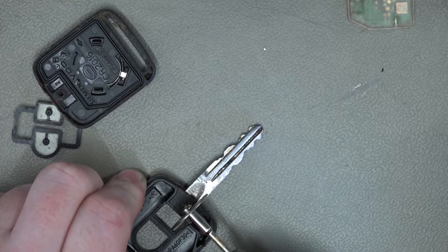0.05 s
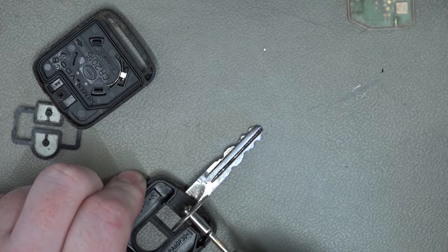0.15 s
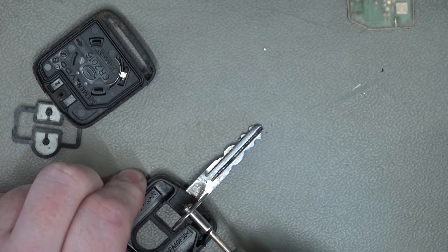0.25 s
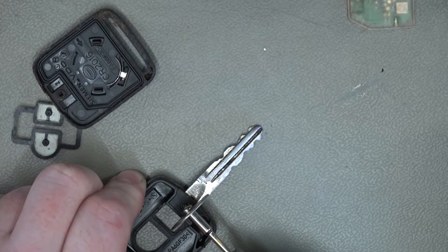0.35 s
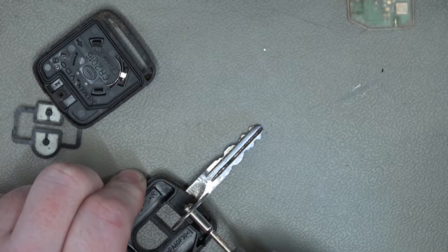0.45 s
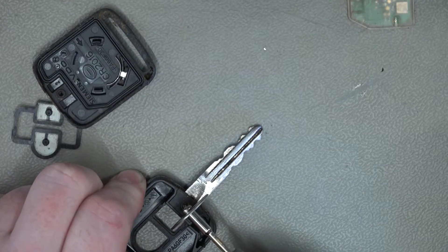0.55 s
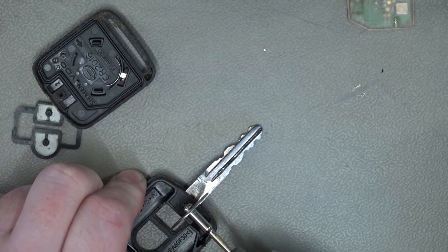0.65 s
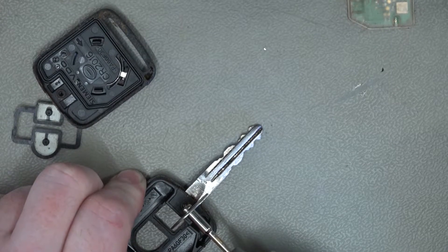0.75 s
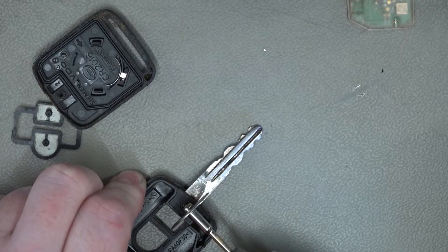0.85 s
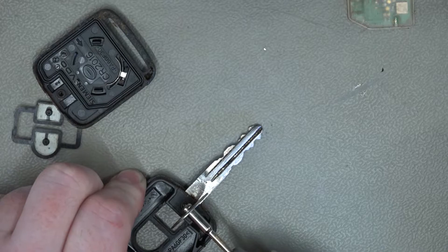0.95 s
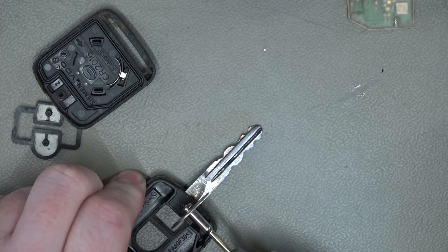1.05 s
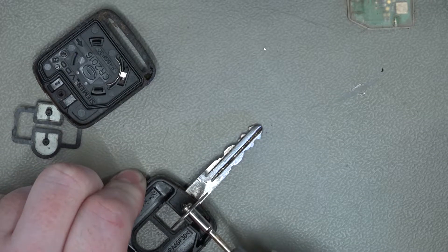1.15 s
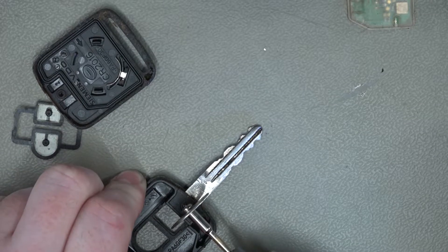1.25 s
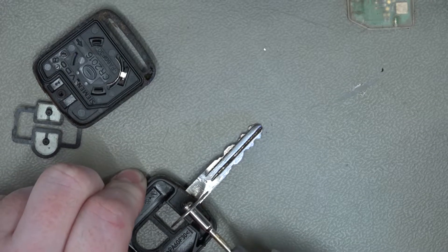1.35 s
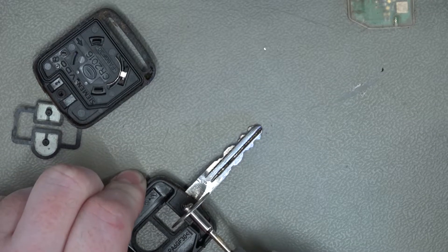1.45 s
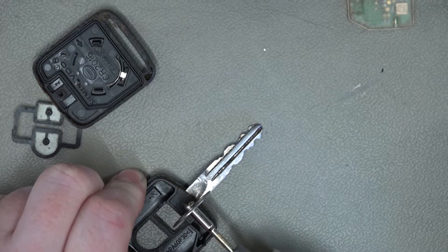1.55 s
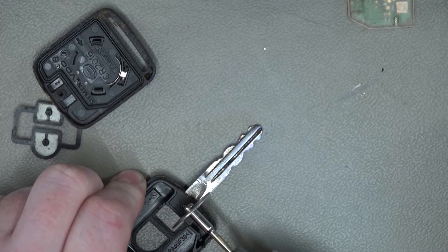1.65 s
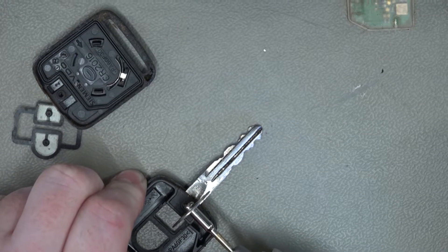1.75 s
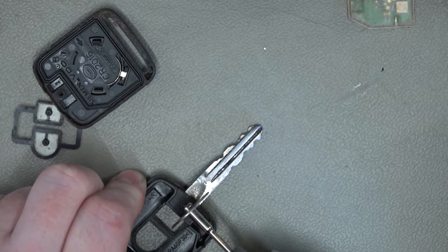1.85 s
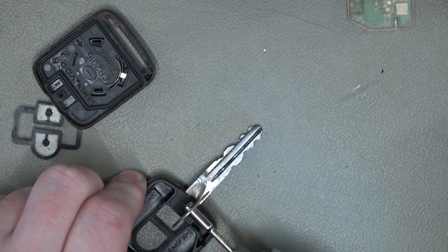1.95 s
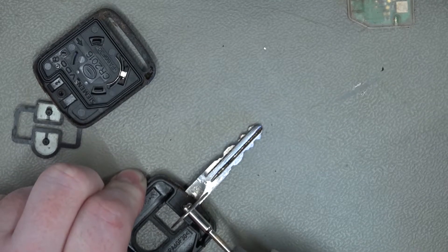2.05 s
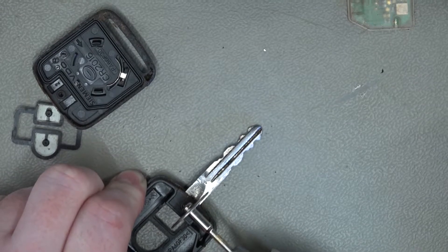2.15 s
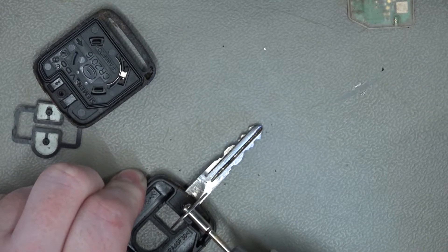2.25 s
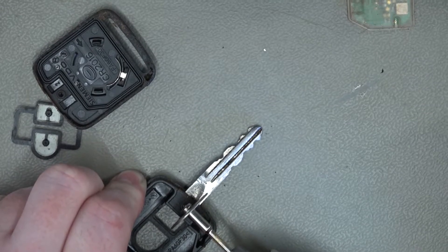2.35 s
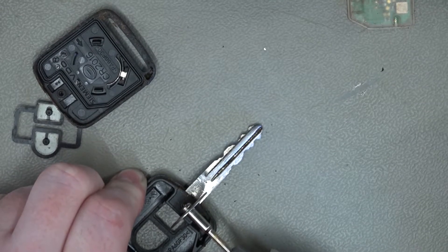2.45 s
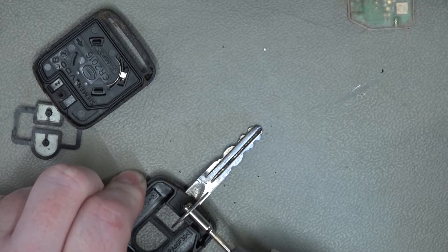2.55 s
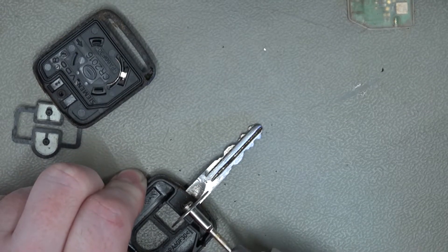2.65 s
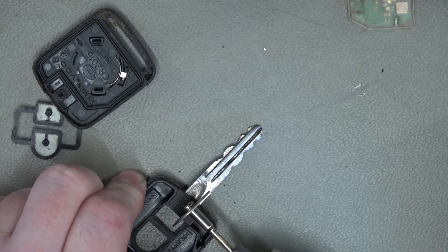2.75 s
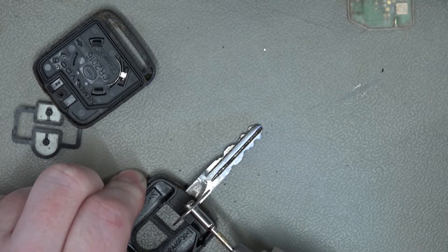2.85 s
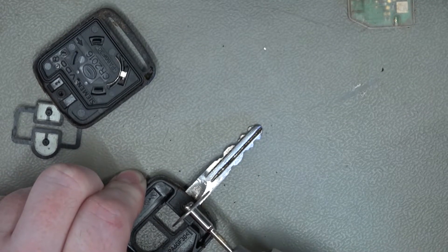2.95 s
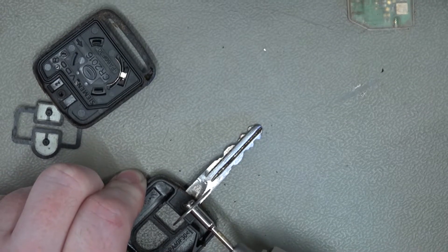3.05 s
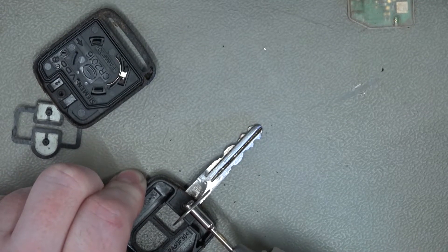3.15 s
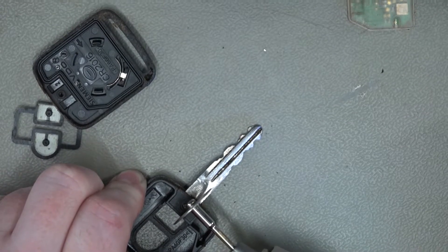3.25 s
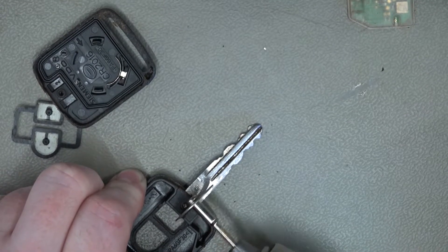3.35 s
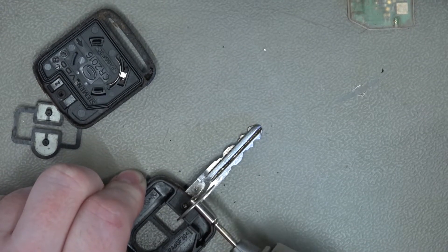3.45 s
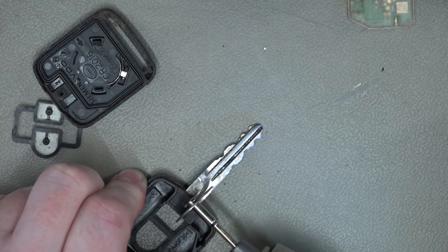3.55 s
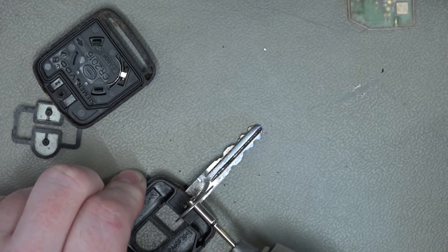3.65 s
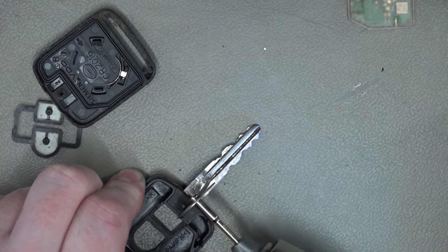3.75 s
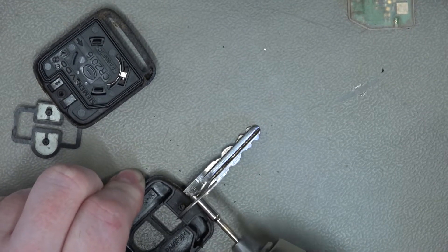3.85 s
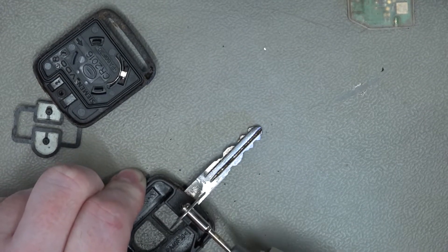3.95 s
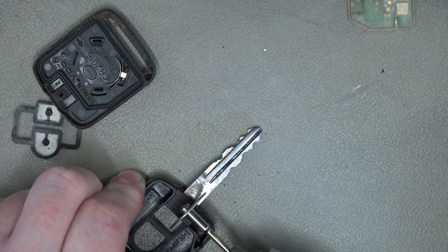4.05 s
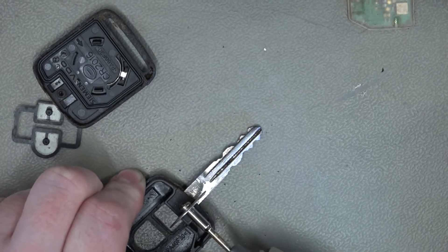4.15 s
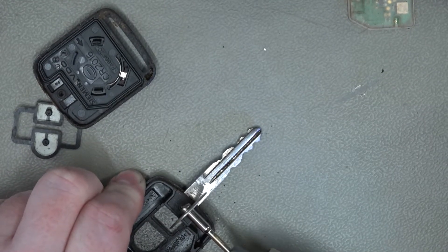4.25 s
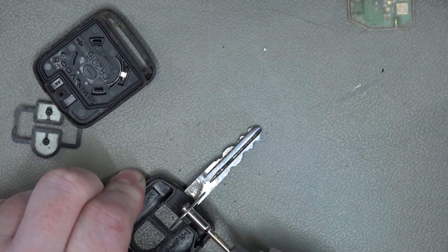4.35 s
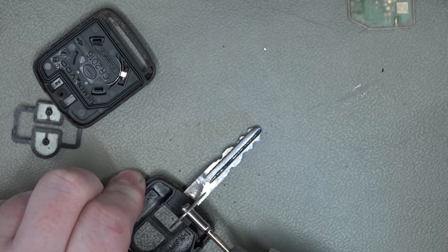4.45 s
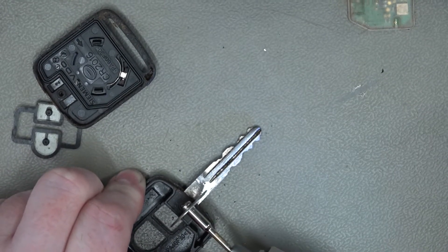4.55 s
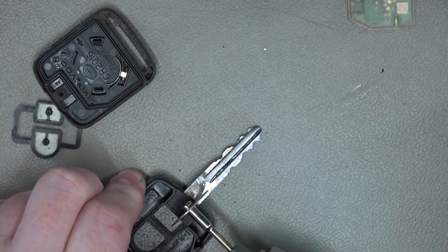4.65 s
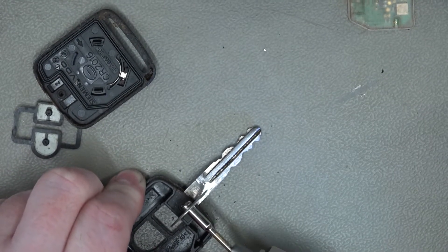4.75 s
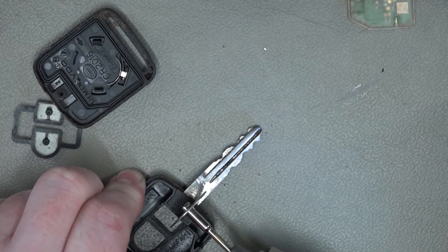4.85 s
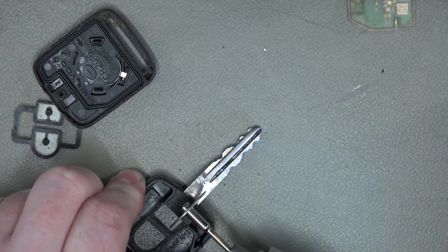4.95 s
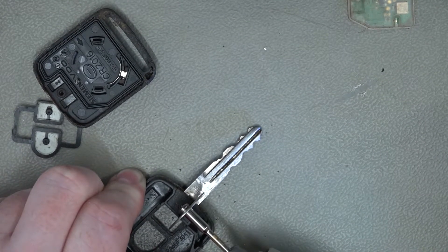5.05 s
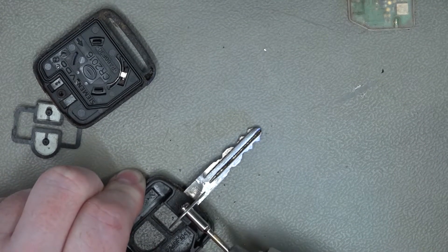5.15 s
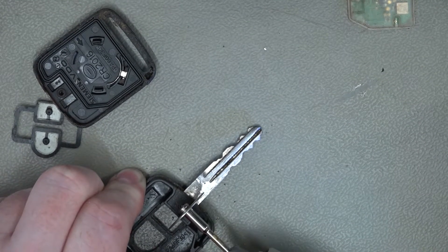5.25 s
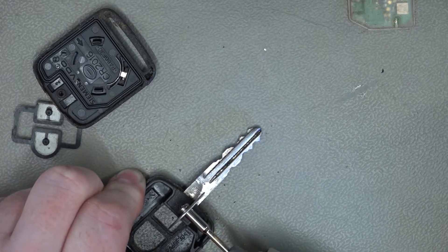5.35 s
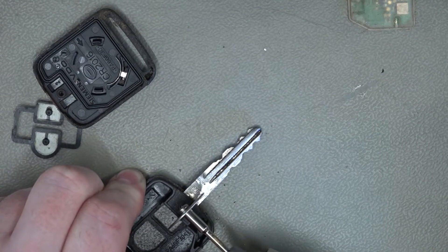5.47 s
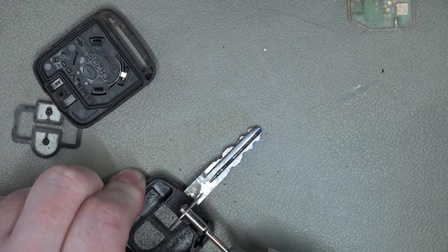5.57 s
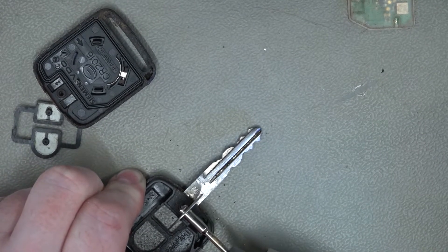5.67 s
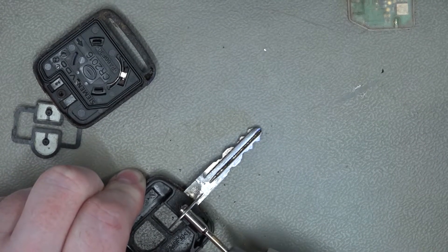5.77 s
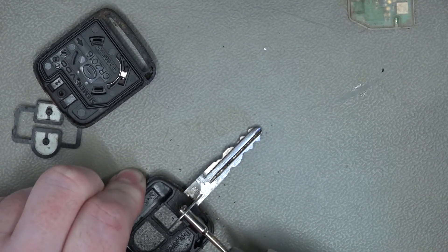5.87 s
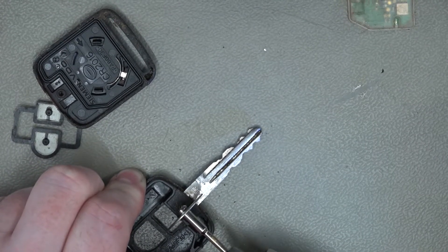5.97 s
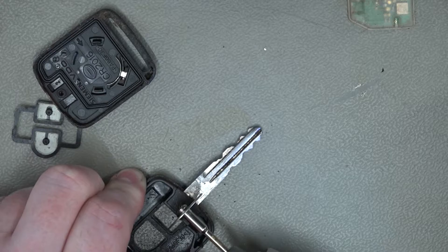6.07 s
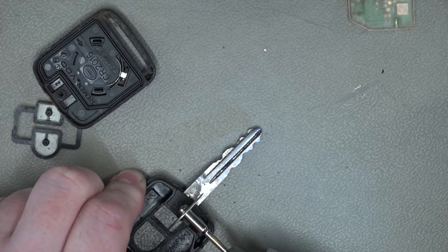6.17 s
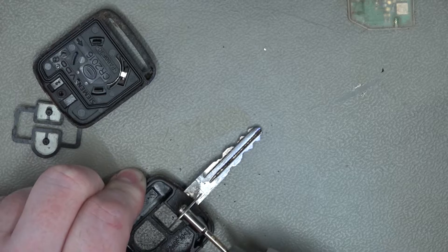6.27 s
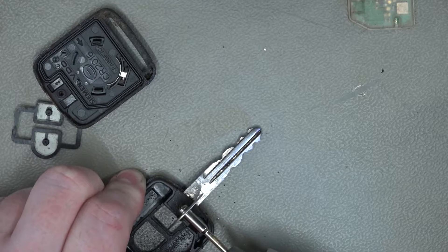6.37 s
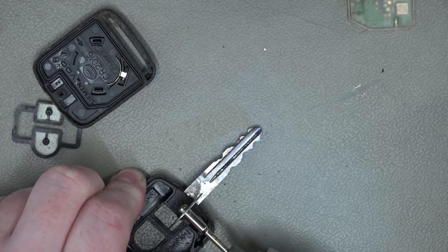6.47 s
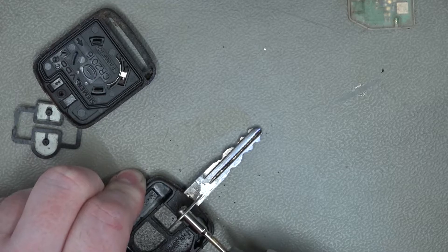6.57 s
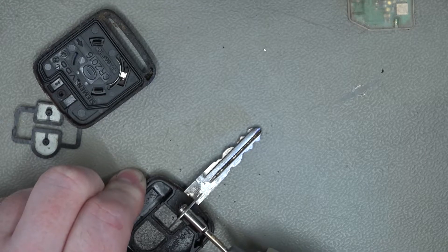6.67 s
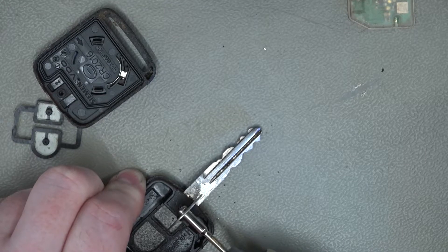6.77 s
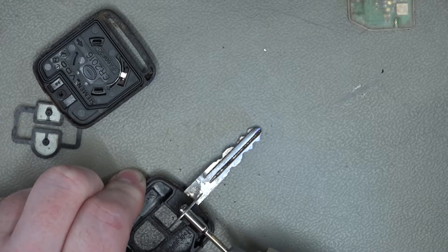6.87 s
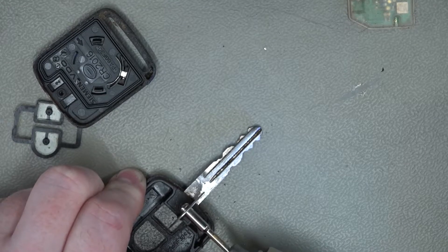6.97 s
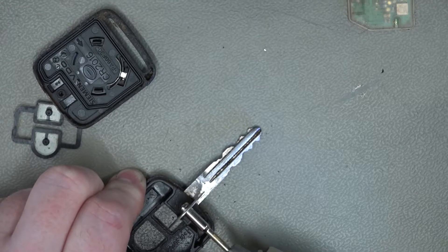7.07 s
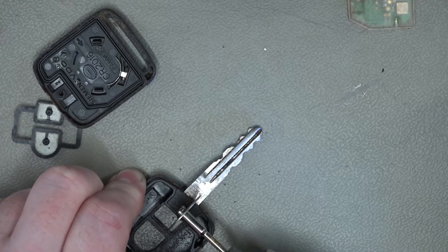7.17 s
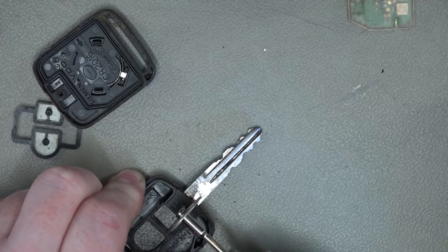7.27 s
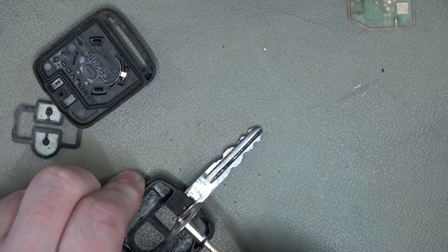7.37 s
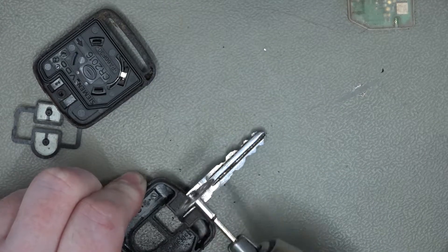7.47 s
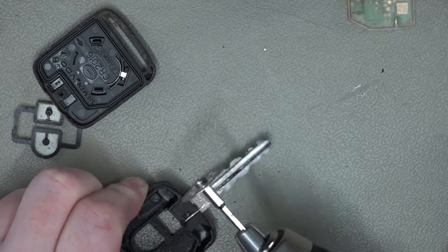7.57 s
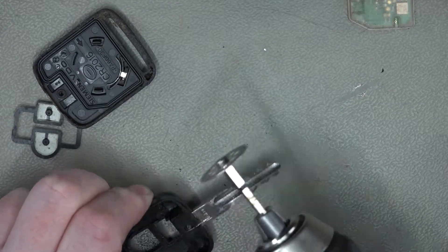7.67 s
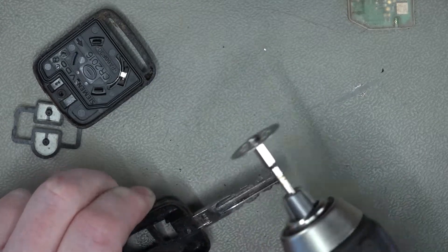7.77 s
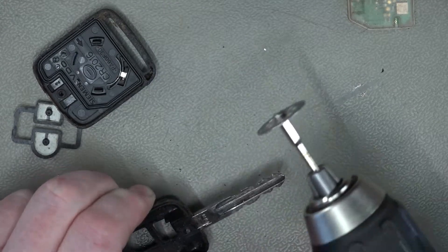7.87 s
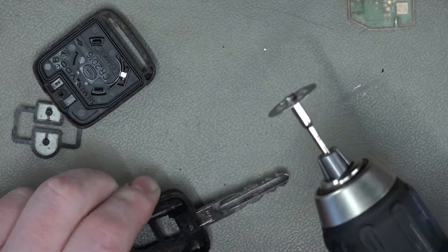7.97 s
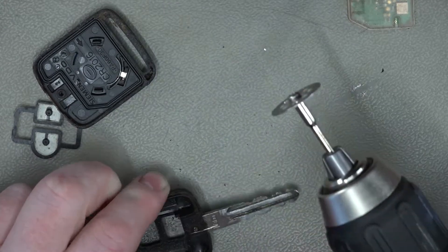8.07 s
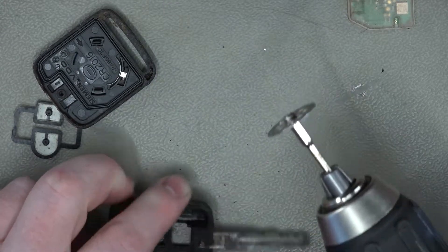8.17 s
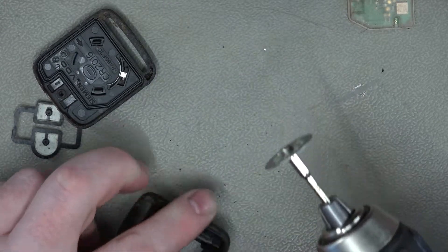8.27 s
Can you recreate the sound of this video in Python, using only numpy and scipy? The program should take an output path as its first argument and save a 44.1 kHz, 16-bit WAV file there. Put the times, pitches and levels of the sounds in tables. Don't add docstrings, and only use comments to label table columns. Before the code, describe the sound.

Steady gritty drill motor whine with a throbbing low shake and thin metallic squeal from cutting plastic, stopping suddenly before light knocks and scuffs.

```python
import sys
import numpy as np
from scipy import signal
from scipy.fft import rfft, irfft
from scipy.io import wavfile
from scipy.ndimage import uniform_filter1d

SR = 44100
rng = np.random.default_rng(int(sys.argv[2]) if len(sys.argv) > 2 else 0)


def elevation(decibels):
    levels = np.asarray(decibels, float)
    return 10 ** (levels / 20)


def inscribe(sig):
    pcm = np.round(np.clip(np.atleast_2d(sig).T, -1, 1) * 32767)
    wavfile.write(sys.argv[1], SR, pcm.astype(np.int16))


N = 366912
T = np.arange(N) / SR
FIRST_STAGE = 3.671
OUT_S, DYING_S = 7.23, 7.485


def evened(x):
    return x / np.sqrt(np.mean(x ** 2) + 1e-20)


def curves(rows):
    t_s, *columns = np.transpose(rows)
    gate = uniform_filter1d(1. * (T <= t_s[-1]) * (T >= t_s[0]), size=600)
    return [np.interp(T, t_s, column) for column in columns] + [gate]


def coloured(points, lo_hz, hi_hz):
    hz = np.fft.rfftfreq(N, 1 / SR)
    point_hz, point_db = np.transpose(points)
    shape_db = np.interp(np.log(hz + 1), np.log(point_hz), point_db)
    z = rfft(rng.standard_normal(N)) * elevation(shape_db)
    inside = (hz > lo_hz) & (hz < hi_hz)
    return irfft(z, N) * N / np.sqrt(2 * np.sum(abs(z[inside]) ** 2))


def modes(x, table):
    out = np.zeros(N)
    for hz, width_hz, db in table:
        b, a = signal.iirpeak(hz, hz / width_hz, SR)
        out += elevation(db) * signal.lfilter(b, a, x) * np.sqrt(SR / np.pi / width_hz)
    return out


def slow(hz):
    knots_s = np.arange(0, N / SR + 1, .5 / hz)
    return evened(np.interp(T, knots_s, rng.standard_normal(len(knots_s))))


def grit(spread_db):
    size = uniform_filter1d(rng.exponential(1, N), size=8)
    return evened(rng.standard_normal(N) * elevation(spread_db * size))


def lobe(turns, at, sharp):
    return np.exp(sharp * (np.cos(2 * np.pi * (turns - at)) - 1))


def tone(turns):
    return np.sqrt(2) * np.cos(2 * np.pi * (turns + rng.random()))


def band(x, hz, kind):
    return signal.sosfiltfilt(signal.butter(4, hz, kind, fs=SR, output="sos"), x)


def bump(at_s, length_s):
    return np.exp(-(2 * (T - at_s) / length_s) ** 4)


def step(at_s, length_s):
    return .5 + .5 * np.tanh(2 * (T - at_s) / length_s)


def law(load, depth, base_db, per_load_db, full_depth_db):
    return base_db + per_load_db * load + full_depth_db * depth


def gears(motor, chuck, load, depth):
    # t/s, level/dB
    near = [(0.0, -35), (0.8, -38.5), (1.3, -38), (2.0, -40.5), (2.8, -39), (3.6, -39), (4.4, -39.5),
            (5.6, -41), (6.0, -39), (7.26, -40.5)]
    # f/Hz, density/dB
    gear_colour = [(35, -37.5), (60, -28), (107, -7.5), (231, -9.5), (351, -10.5), (385, -8), (443, -16),
                   (613, -39), (931, -1.5), (2300, -3.5), (3190, -0.5), (4220, -5.5), (5700, 0.5),
                   (6560, -12), (15500, -23)]
    # f/Hz, width/Hz, level/dB
    shell = [(906, 74, -6.5), (1800, 54, -6.5), (3950, 180, -20), (5100, 600, -18), (5455, 38, -7),
             (5510, 80, -21), (14600, 1100, -13)]
    # f/Hz, width/Hz, level/dB
    facing = [(3410, 130, -12), (3477, 37, -4.5), (3665, 180, -3.5), (4930, 960, -2)]
    brake_s, turned_s = 7.3, 7.36
    dying_for_s = np.maximum(T - DYING_S, 0)
    level_db = curves(near)[0] - 4.5 * step(brake_s, .05) - 351 * dying_for_s
    level_db -= 2.5 * bump(4.03, .17)
    facing_db = law(load, depth, -0.12, 0, -2.1) + 6.3 * step(turned_s, .04)
    low_db = law(load, depth, -2.74, -0.17, .2) + 6 * step(brake_s, .05) + 60 * dying_for_s

    stage = 2 * np.pi * motor / FIRST_STAGE
    throb = 1 + 0.14 * np.cos(stage) + 0.02 * np.cos(2 * stage) + 0.081 * np.cos(3 * stage)
    throb += 0.14 * np.cos(2 * np.pi * motor)
    throb += 0.03 * np.cos(2 * np.pi * (chuck + 0.03))

    body = elevation(-2.0) * coloured(gear_colour, 5283, 6160) + modes(grit(1.3), shell)
    low = band(body, 4300, "low")
    top = band(body, 6100, "high")
    speed = np.gradient(motor) * SR / 387
    body += low * (elevation(0.21 * (low_db + 2.5)) - 1)
    body += top * (speed ** 0.5 - 1)
    body += elevation(1.9 * facing_db) * speed ** 2 * modes(grit(2.5), facing)
    return elevation(level_db + 0.44 * slow(9)) * throb * body


def whine(motor, chuck, load, depth):
    # motor order, level/dB
    faint = [(4, -56), (9, -52), (15, -57), (9 / FIRST_STAGE, -52), (4.72, -57), (14.6, -57), (21, -66),
             (32, -73)]
    # first-stage order, level/dB
    teeth = [(46, -2), (47, -5), (48, -2), (49, -4)]
    # motor order, t/s, length/s, level/dB
    flare_rows = [
        (10, 7.29, .18, -43),
        (10, 7.345, .06, -44),
        (1, 7.37, .09, -55),
        (4, 7.37, .11, -48),
        (14.6, 7.418, .017, -33),
    ]
    tenth_db = law(load, depth, -43, 2.8, -2.4)
    eighth_db = law(load, depth, -42, -.5, -4)
    shaft_db = law(load, depth, -49, -2.4, -5)
    teeth_db = law(load, depth, -43, 0.73, -7.5)
    last_db = law(load, depth, -45, -2, 10.3)
    shaft_db += 2.8 * bump(5.65, .7)

    wobble = motor + 0.007 * slow(40)
    out = elevation(tenth_db + 1.3 * slow(5)) * tone(10 * wobble)
    out += elevation(eighth_db + 1.4 * slow(8)) * tone(8 * wobble)
    swell = 1 + 0.4 * np.cos(2 * np.pi * (chuck + 0.11))
    out += elevation(shaft_db + 0.87 * slow(7)) * swell * tone(motor)
    for order, db in faint:
        out += elevation(db + 4.1 * slow(13)) * tone(order * wobble)
    for order, db in teeth:
        out += elevation(teeth_db + db + 2.3 * slow(14)) * tone(order / FIRST_STAGE * wobble)
    out += elevation(last_db - 10 + 2.7 * slow(17)) * tone(50 / FIRST_STAGE * wobble)

    flares = sum(elevation(db) * bump(t_s, length_s) * tone(order * wobble) for order, t_s, length_s, db in flare_rows)
    return (1 - step(OUT_S, .03)) * out + flares * elevation(1.7 * slow(90))


def shake(motor, chuck, load, depth):
    # t/s, level/dB
    grip = [(0.0, -21), (0.5, -21), (1.0, -27), (1.25, -26), (1.5, -23), (2.5, -23.5), (2.75, -24.5),
            (3.0, -23), (3.5, -24.5), (4.0, -28), (4.4, -26), (5.25, -29), (5.75, -29), (6.25, -27.5),
            (6.6, -27), (7.2, -28)]
    # chuck order, level/dB
    low_orders = [(2, -7.5), (3, -13), (4, -7), (5, -10)]
    # chuck order, level/dB
    high_orders = [(6, -9.5), (7, -5.5), (8, -10), (9, -5.5), (10, -16), (11, -16), (12, -14), (13, -19),
                   (14, -13.5), (16, -7.5), (18, -18), (19, -20), (23, -17)]
    grip_db = curves(grip)[0]
    fade_db = -72 * np.maximum(T - OUT_S, 0)
    low_db = law(load, depth, -50, 1, 0) + 1.5 * (grip_db + 25)
    over_db = law(load, depth, -55.5, 2.2, 6.8) + 1.1 * (grip_db + 25.5)

    low = sum(elevation(db + 2.5 * slow(2.8)) * tone(order * chuck) for order, db in low_orders)
    low += elevation(-9) * tone(motor / FIRST_STAGE)
    low += elevation(-4.5) * coloured([(25, -7), (45, 1.5), (120, 3), (200, -32.5)], 45, 150)
    low *= 1 - step(DYING_S, .06)

    over = elevation(-12) * coloured([(90, -27.5), (140, 21.5), (300, 0.5), (600, 2.5)], 134.6, 340)
    for order, db in high_orders:
        tilt_db = 1.35 * (depth - 0.52) * min(order - 9, 3)
        over += elevation(db + tilt_db + 2.1 * slow(1.21)) * tone(order * chuck)

    unbalance = elevation(grip_db + fade_db) * np.sqrt(2) * np.cos(2 * np.pi * chuck)
    return unbalance + elevation(low_db) * low + elevation(over_db + 3.9 * fade_db) * over


def room():
    # f/Hz, density/dB
    air = [(20, 0), (60, -5), (130, -20), (300, -27), (750, -26), (1600, -36), (3500, -46), (8000, -62),
           (15500, -82)]
    # f/Hz, level/dB
    hum_lines = [(49.5, -60), (100, -74.5), (143, -80), (500, -85), (700, -87.5), (750, -82.5)]
    sway = coloured([(3, -11), (8, 20), (13, 10), (19, 21), (30, 14), (60, -55)], 5.5, 19)
    sway /= np.sqrt(uniform_filter1d(sway ** 2, size=5000) + .1)
    sway_db = -40.5 + 2 * slow(1.5) - 16 * step(7.6, .1)
    hum = sum(elevation(db) * tone(hz * T) for hz, db in hum_lines)
    return elevation(-78) * coloured(air, 150, 15000) + hum + elevation(sway_db) * sway


def cut(chuck, load, depth):
    # f/Hz, width/Hz, level/dB
    disc = [(2713, 77, 3), (2764, 23, 5.5), (2880, 49, 3.5)]
    # f/Hz, width/Hz, level/dB
    housing = [(997, 113, 0.5), (1035, 50, -0.5)]
    # f/Hz, width/Hz, level/dB
    slot_edge = [(1130, 90, 3), (1324, 84, -2), (1456, 80, -10)]
    # t/s, length/s, level/dB
    catches = [
        (0.895, 0.17, -56),
        (1.523, 0.45, -47),
        (2.695, .35, -47),
        (3.417, 0.19, -39.5),
        (3.52, 0.054, -42),
        (3.785, .09, -32.5),
        (3.886, 0.11, -38),
        (4.22, 0.093, -47),
        (6.2, 0.23, -46.5),
        (7.08, 0.15, -47.5),
    ]
    # t/s, length/s, level/dB
    leans = [
        (2.95, 0.96, -49),
        (3.498, 0.066, -44),
        (3.64, .1, -45),
        (4.241, .14, -42.5),
        (4.45, .3, -46.5),
        (4.663, 0.09, -47),
        (5.28, 0.23, -46.5),
        (5.616, 0.17, -51),
    ]
    ring = elevation(law(load, depth, -56, 0, 23.25))
    thrum = elevation(law(load, depth, -51.5, .5, 4.5))
    scrape = elevation(law(load, depth, -50, 0.89, -2))
    hiss_db = law(load, depth, -57, 0.34, 6.9)
    hiss_db += 2.7 * bump(4.35, 1.6)
    scrape += sum(elevation(db) * bump(t_s, length_s) for t_s, length_s, db in catches)
    thrum += sum(elevation(db) * bump(t_s, length_s) for t_s, length_s, db in leans)

    bite = elevation(slow(20))
    touch = bite * (lobe(chuck, .07, 2.6) + .5 * lobe(chuck, .5, 4) + .1)
    squeal_hz = 2790 + 60 * slow(90) + 40 * np.cos(2 * np.pi * (2 * chuck + 0.31))
    squeal = evened(touch * elevation(0.92 * slow(110)) * tone(np.cumsum(squeal_hz) / SR))
    out = ring * (.8 * squeal + 0.5 * evened(modes(grit(3.5) * touch, disc)))

    knead = bite * (lobe(chuck, 0.0064, 0.58) + 1.75 * lobe(chuck, -0.3, 19))
    out += thrum * evened(modes(grit(4.1) * knead, housing))
    out += scrape * evened(modes(grit(6.7) * (knead + 0.5), slot_edge))

    dust = coloured([(1000, 0), (6000, -5.5), (9300, 8.5), (10300, -10), (16000, -16)], 7000, 10000)
    spray = evened(lobe(chuck, -.079, 1.1) + .3)
    out += elevation(hiss_db + 1.3 * slow(30)) * dust * bite * spray
    return (1 - step(OUT_S + .025, .03)) * out


def handling():
    # f/Hz, width/Hz, level/dB
    part = [(325, 29, -2), (700, 39, -4.5), (940, 26, -5.5), (1600, 110, -7), (2070, 77, -29),
            (2530, 77, -9), (3320, 140, -7.5)]
    # start/s, length/s, level/dB, brightness/dB, sag/(dB/s)
    strokes = [
        (7.56, .13, -70.5, -14, 20),
        (7.693, 0.04, -46, -25.5, 60),
        (7.736, 0.074, -44.5, -19.5, 160),
        (7.809, 0.082, -58.5, -13.5, -80),
        (7.893, 0.332, -69, -12, 25),
        (8.196, 0.12, -85, -2, -150),
    ]
    # t/s, peak/dB, f/Hz, width/Hz, t60/s
    clicks = [(7.445, -30, 3950, 400, .3), (7.465, -34, 765, 700, .04), (7.514, -33.5, 3020, 1800, .03),
              (7.539, -42, 1500, 2000, .03), (7.697, -44, 2600, 1500, .015), (7.7, -40, 700, 201, 0.038),
              (7.737, -46, 1500, 1200, .03), (7.872, -41.5, 2190, 1800, .008),
              (7.96, -67, 3500, 700, 0.033), (8.016, -53, 4850, 4000, 0.0072),
              (8.017, -56, 1100, 600, 0.033)]
    # t/s, peak/dB, f/Hz, t60/s
    thumps = [
        (7.448, -22, 21, 0.34),
        (7.525, -31, 13.4, 0.23),
        (7.688, -30, 23, 0.36),
        (7.741, -33, 13.2, 4.6),
    ]
    drag = elevation(-2.5) * evened(band(modes(grit(5), part), 4100, "low"))
    drag += elevation(-2) * coloured([(100, -9), (250, -0.5), (1000, 2), (3700, -12), (4500, -40), (9000, -70)], 400, 4000)
    fizz = coloured([(3000, -28), (4200, -2.5), (6000, -6.5), (7200, -10), (15000, -27)], 4000, 9000)
    out = np.zeros(N)
    for start_s, length_s, db, bright_db, sag_db_per_s in strokes:
        envelope = step(start_s, .0054) * (1 - step(start_s + length_s, .021))
        envelope *= elevation(db - sag_db_per_s * (T - start_s))
        out += envelope * elevation(-2.5) * (drag + elevation(bright_db) * fizz)

    click_t = T[:3000]
    for t_s, db, hz, width_hz, t60_s in clicks:
        b, a = signal.iirpeak(hz, hz / width_hz, SR)
        burst = rng.standard_normal(len(click_t)) * elevation(-60 * click_t / max(t60_s, .003))
        knock = signal.lfilter(b, a, signal.lfilter(b, a, burst))
        out[round(t_s * SR):][:len(click_t)] += elevation(db) * knock / abs(knock).max()

    settle = 1 - step(8.28, .04)
    for t_s, db, hz, t60_s in thumps:
        after_s = np.maximum(T - t_s, 0)
        out -= elevation(db - 60 * after_s / t60_s) * np.sin(2 * np.pi * hz * after_s) * settle
    return out


def scene():
    # t/s, motor speed/(turns/s)
    running = [(0.0, 388.2), (0.24, 385.8), (0.85, 389.3), (1.33, 389.1), (1.4, 386.4), (2.27, 385.9),
               (3.24, 388.7), (3.54, 383.9), (3.6, 386.9), (3.91, 382.1), (4.01, 390.4), (4.82, 384.4),
               (5.06, 390.3), (5.79, 389.7), (6.74, 385.8), (6.94, 388.4), (7.03, 383.6), (7.27, 390.9)]
    # t/s, motor speed/(turns/s)
    braking = [(7.317, 396), (7.369, 347.5), (7.41, 277.5), (7.451, 228), (7.501, 94), (7.54, 4.3)]
    # t/s, depth/(0-1)
    depth_rows = [(0.0, 0), (1.0, 0), (2.4, 0.53), (2.65, 0.3), (3.2, 0.68), (3.85, 0.87), (4.1, 0.76),
                  (4.5, 0.89), (4.92, 1.), (5.1, 0.77), (5.5, 0.85), (6.0, 0.98), (7.15, 0.96), (7.3, 0.66)]
    turns_per_s = curves(running + braking)[0]
    motor = np.cumsum(turns_per_s) / SR
    chuck = motor / 15.256 + .124
    load = uniform_filter1d(np.clip((387.5 - turns_per_s) / 3, -1.5, 1.5), size=6000)
    depth = curves(depth_rows)[0]
    mix = gears(motor, chuck, load, depth) + whine(motor, chuck, load, depth)
    mix += shake(motor, chuck, load, depth) + room()
    mix += cut(chuck, load, depth) + handling()
    return mix[None]


def top_cut(x):
    return signal.sosfilt(signal.butter(12, 15640, fs=SR, output="sos"), x)


def record(dry):
    return top_cut(dry)


dry = scene()
out = record(dry)
inscribe(out)
```